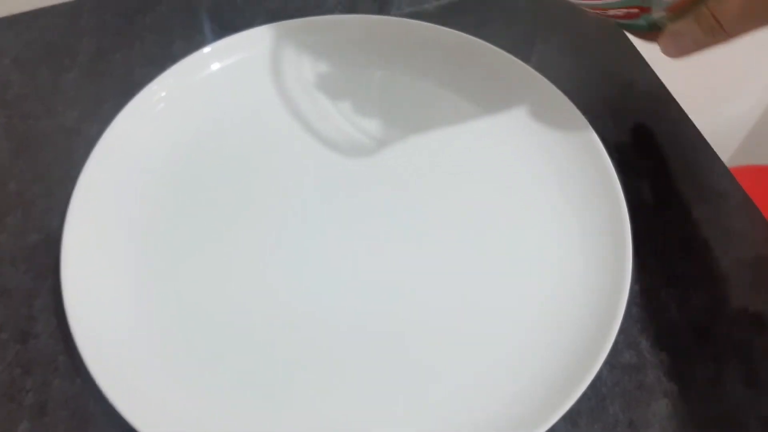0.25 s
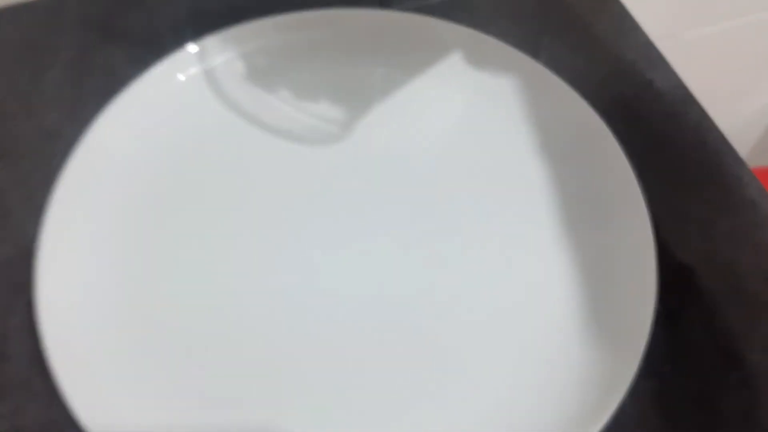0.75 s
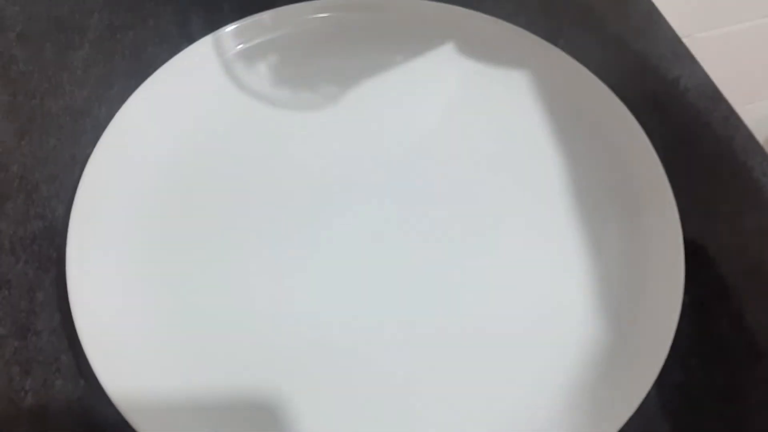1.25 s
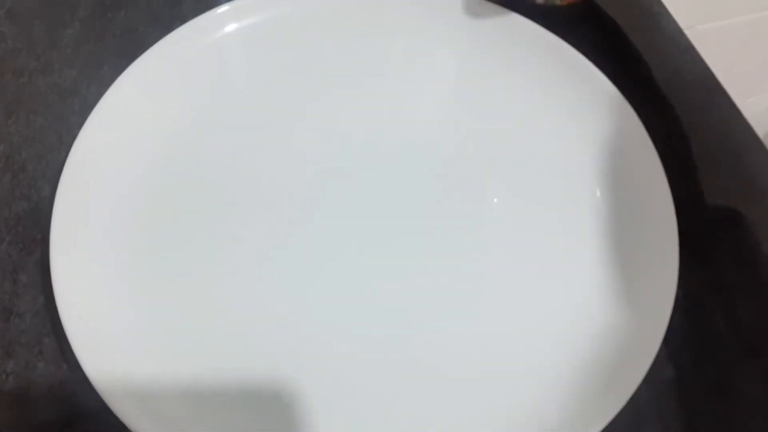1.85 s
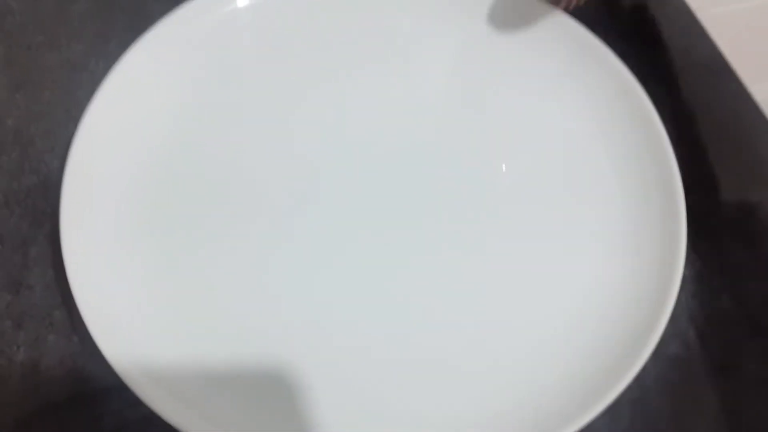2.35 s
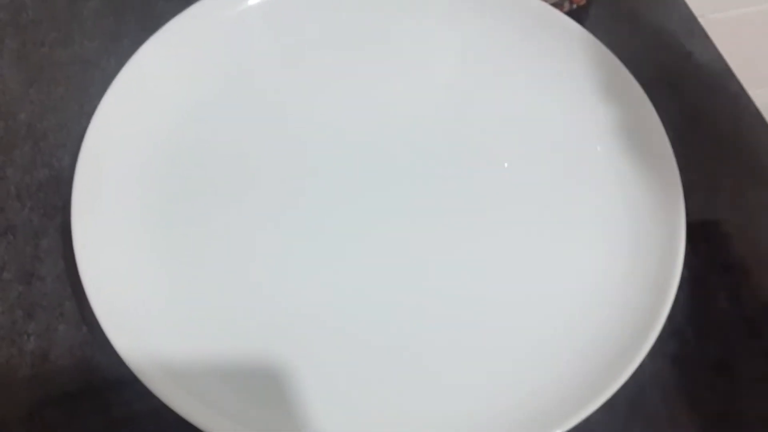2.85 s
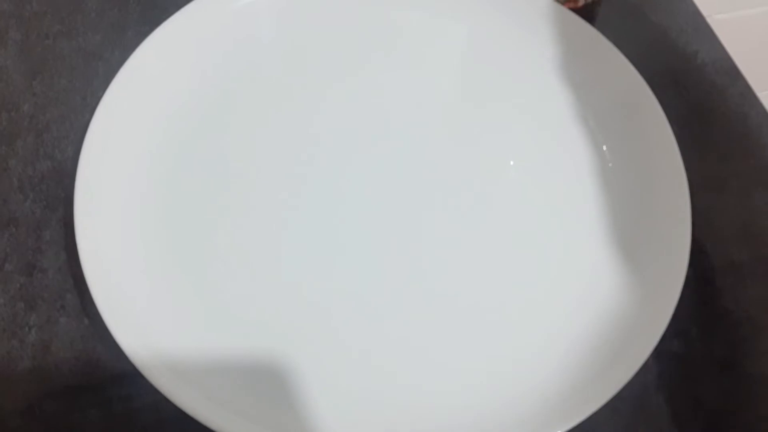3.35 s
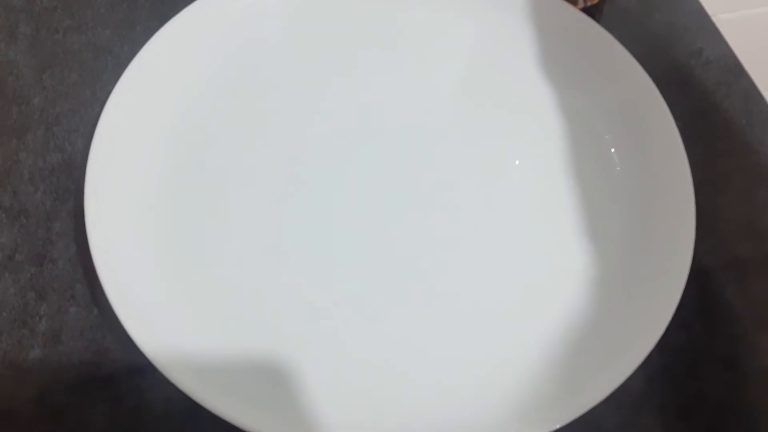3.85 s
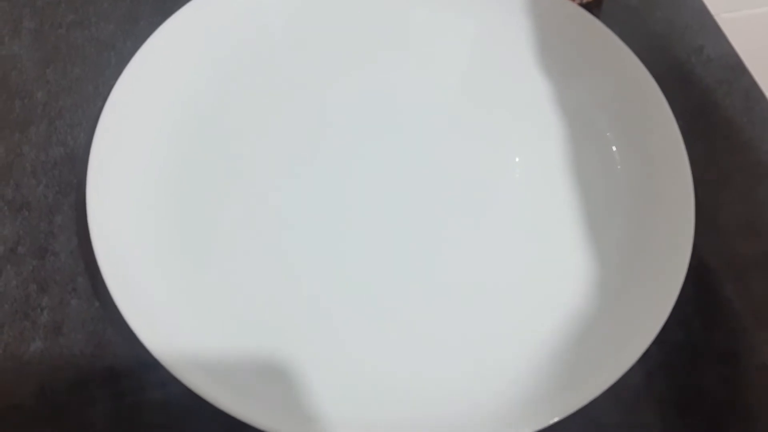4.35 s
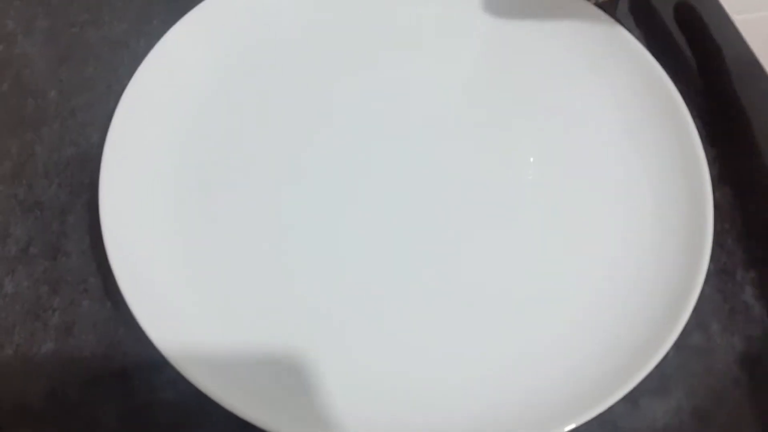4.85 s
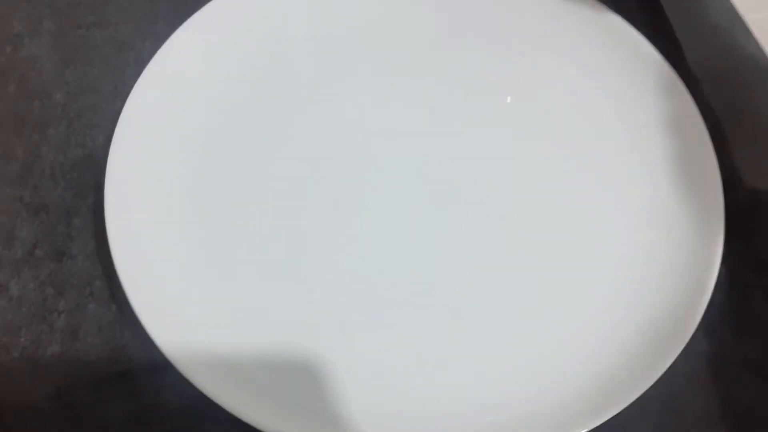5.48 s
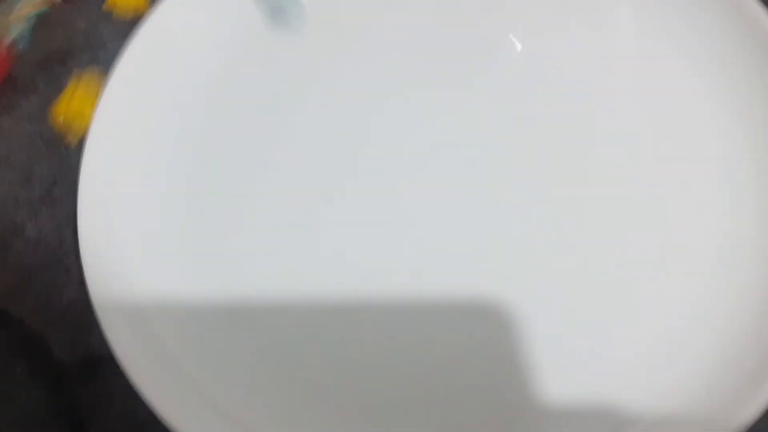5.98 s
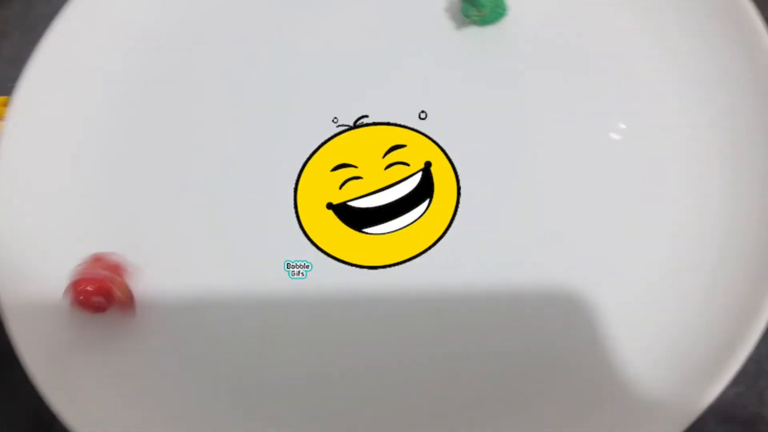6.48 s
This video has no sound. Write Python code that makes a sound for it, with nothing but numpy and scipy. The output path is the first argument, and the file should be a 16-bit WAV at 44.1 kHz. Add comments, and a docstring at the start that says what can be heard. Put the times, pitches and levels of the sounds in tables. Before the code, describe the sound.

Fitful plastic crackling and soft knocks close by in a small kitchen, then hard light pieces tumble and patter across plate and worktop.

```python
"""A thin plastic tub of sugar-coated popcorn is handled over a kitchen worktop: it rustles, crackles and thumps.
Then it is tipped: the popcorn tumbles out in a dense clatter and a few hard pieces set a china plate ringing.
Rustle and clatter are sums of tiny filtered noise bursts; tub and plate are banks of decaying modes.
A small, hard-walled room adds short echoes, over a faint low rumble and hiss."""
import sys
import numpy as np
from scipy import signal
from scipy.fft import rfft, irfft, next_fast_len
from scipy.io import wavfile
from scipy.ndimage import uniform_filter1d

SR = 44100
rng = np.random.default_rng(int(sys.argv[2]) if len(sys.argv) > 2 else 0)


def wav_out(sig):
    """Save sig, one row per channel (or a flat mono array), as 16-bit PCM at SR to the path in sys.argv[1]."""
    wavfile.write(sys.argv[1], SR, np.round(np.clip(np.atleast_2d(sig).T, -1, 1) * 32767).astype(np.int16))


N = 296352
TIME = np.arange(N) / SR  # s


def from_db(db):
    """Level to amplitude: 20 dB is a factor of ten."""
    return 10 ** (np.asarray(db) / 20)


def rms_one(x):
    """Normalise the effective value: root mean square 1."""
    return x / np.sqrt(np.mean(x ** 2) + 1e-20)


def at_hz(points, hz):
    """Linear interpolation of a table on a log-frequency axis."""
    table = np.array(points)
    return np.interp(np.log(np.maximum(hz, 1)), np.log(table[:, 0]), table[:, 1])


def pan(left_db):
    """Level-difference stereo: half the left-right difference goes to each channel."""
    return from_db(np.array([[.5], [-.5]]) * left_db)


def add(track, s, sound):
    """Superposition: mix a sound into a track from a time in seconds."""
    at = round(s * SR)
    track[:, at:at + sound.shape[1]] += sound[:, :N - at]


def causal_filter(gain_at, size=2048):
    """Minimum phase: folding the cepstrum gives a unit-energy response in which nothing sounds early."""
    log_gain = np.log(gain_at(np.fft.rfftfreq(size, 1 / SR)) + 1e-9)
    cepstrum = irfft(log_gain)
    cepstrum[1:size // 2] *= 2
    cepstrum[size // 2 + 1:] = 0
    response = irfft(np.exp(rfft(cepstrum)))
    return response[None] / np.linalg.norm(response)


def colour(x, spectrum):
    """Linear filtering: convolution gives a sound the shape of a spectrum."""
    response = causal_filter(lambda hz: from_db(at_hz(spectrum, hz)), size=8192)
    return signal.fftconvolve(x, response)[:, :x.shape[1]]


# likeness of the two microphones: frequency_hz [Hz], likeness [0-1]
MICROPHONE_LIKENESS = [(100, 0.91), (300, 0.95), (700, 0.4), (1500, 0.02), (3000, 0.11), (8000, 0.02)]


def microphones(pair):
    """Spatial coherence: unrelated signals become left and right, alike in the bass, apart in the treble."""
    count = next_fast_len(pair.shape[1])
    alike = np.clip(at_hz(MICROPHONE_LIKENESS, np.fft.rfftfreq(count, 1 / SR)), 0, 1)
    mid, side = rfft(pair, count) * np.sqrt([(1 + alike) / 2, (1 - alike) / 2])
    return irfft([mid + side, mid - side], count)[:, :pair.shape[1]]


PIECE_COLOUR_DB = 2.7  # standard deviation of the random gains that tell one piece from the next


def crunch(decay_s, size=4096):
    """Stick-slip: a contact breaks up into a dying burst of tiny slips; unit energy a side."""
    dying = from_db(-60 * np.arange(size) / SR / max(decay_s, .001))
    spectrum = rfft(rng.standard_normal((2, size)) * dying)
    # half-flatten the spectrum, and put the other half of the decay back
    evened = irfft(spectrum / np.sqrt(np.abs(spectrum) + 1e-9))
    burst = microphones(evened * np.sqrt(dying))
    # every piece has its own shape, and so its own broad resonances
    shape = np.column_stack([np.geomspace(500, 16000, 24), rng.normal(0, PIECE_COLOUR_DB, 24)])
    burst = signal.fftconvolve(burst, causal_filter(lambda hz: from_db(at_hz(shape, hz))))
    return burst / np.linalg.norm(burst, axis=1, keepdims=True)


# colour common to single contacts: frequency_hz [Hz], relative level_db_per_hz [dB per Hz]
CONTACT_SPECTRUM = [(30, -12), (80, 5), (160, -17), (450, 11), (800, 12.5), (1300, 8.5), (2300, 5.5),
                    (3800, 1), (6000, 7.5), (10000, 8), (13000, -1.5), (16000, -26)]


def contacts(rows, level_db, decay_s):
    """Impact excitation: each contact is a short crunch with its own weight of bass and treble."""
    out = np.zeros((2, N))
    for s, db, bass_db, treble_db in rows:
        tilt = [(400, bass_db), (1250, 0), (3700, 0), (7500, treble_db)]
        gain_at = lambda hz: from_db(at_hz(CONTACT_SPECTRUM, hz) + at_hz(tilt, hz))
        # the filter has unit energy, so the strength of its curve is put back
        strength = np.sqrt(np.mean(gain_at(np.linspace(0, SR / 2, 512)) ** 2))
        sound = signal.fftconvolve(crunch(decay_s), causal_filter(gain_at))
        add(out, s, from_db(db + level_db) * strength * sound)
    return out


def struck(modes, blows, count=30000):
    """Modal excitation: a blow rings the modes near its centre most; harder contacts centre higher."""
    out, t = np.zeros((2, N)), TIME[:count]
    rings = []
    for hz, db, t60, left_db in modes:
        decay = from_db(db - 60 * t / t60)
        rings.append(pan(left_db) * decay * np.exp(2j * np.pi * hz * t))
    for s, blow_db, centre_hz, spread_octaves in blows:
        sound = 0
        for (hz, *_), ring in zip(modes, rings):
            share = np.exp(-.5 * (np.log2(hz / centre_hz) / spread_octaves) ** 2)
            # short waves reach the two microphones out of step
            apart = (1 - at_hz(MICROPHONE_LIKENESS, hz)) * rng.uniform(-.8, .8, (2, 1))
            phase = np.pi * (rng.integers(2) + apart)
            sound = sound + share * (ring * np.exp(1j * phase)).imag
        add(out, s, from_db(blow_db) * sound)
    return out


GRAIN_SPREAD_DB = 3.9  # how much the sizes of tiny contacts scatter: mean of the exponential draw


def grains(spectrum, per_s, spread_db, decay_s, count=8):
    """Shot noise: many random contacts, dealt to several kinds of crunch; level evened to about rms 1."""
    out = 0
    for _ in range(count):
        sizes = from_db(spread_db * np.minimum(rng.exponential(1, N), 4)) * rng.choice([-1, 1], N)
        clicks = sizes * (rng.random(N) < per_s / count / SR)
        out = out + signal.oaconvolve(clicks[None], crunch(decay_s))[:, :N]
    out = colour(out, spectrum)
    power = uniform_filter1d(np.mean(out ** 2, axis=0), size=2600)
    return out / np.sqrt(power + 0.0008 * power.mean())


def strokes(rows, attack_s, release_db_per_s):
    """Envelope: attack, hold and release, summed in power; one gain in time per level column."""
    power = 0
    for start, hold_s, *levels_db in rows:
        age = TIME - start
        attack = np.clip(age / attack_s, 0, 1)
        release = from_db(-release_db_per_s * np.clip(age - attack_s - hold_s, 0, 1))
        power = power + np.outer(from_db(levels_db), attack * release) ** 2
    return np.sqrt(power)


def strays(gain, start_s, over_db, bass_db, treble_db, count):
    """Random process: lesser contacts at scattered moments, levelled against the rustle around them."""
    draws, spread_db = rng.random((count, 4)), 4
    times = start_s + (np.arange(count) + draws[:, 0]) / count * (TIME[-1] - start_s)
    levels = draws[:, 1:] * 2 * spread_db - spread_db + [over_db, bass_db, treble_db]
    levels[:, 0] += 20 * np.log10(np.interp(times, TIME, gain) + 1e-9)
    return np.column_stack([times, levels])


# the rumble at rest keeps its level; past a threshold of movement it follows a share of the swing in dB
RUMBLE_DB, RUMBLE_THRESHOLD_DB, RUMBLE_FOLLOWS = -69.5, -78.5, 0.28
HISS_DB = -77
# low rumble of the room: frequency_hz [Hz], relative level_db_per_hz [dB per Hz]
RUMBLE_SPECTRUM = [(20, -15.5), (50, -9.5), (80, 2), (140, 0), (220, -8), (400, -15), (1000, -24),
                   (3000, -85)]
# faint hiss: frequency_hz [Hz], relative level_db_per_hz [dB per Hz]
HISS_SPECTRUM = [(300, -17.5), (1000, -8), (4000, -15), (10000, -18), (13000, -22.5), (16000, -27)]


def background(movement):
    """Filtered noise: a low rumble that swells when the tub moves, under a faint steady hiss."""
    rumble = rms_one(colour(microphones(rng.standard_normal((2, N))), RUMBLE_SPECTRUM))
    hiss = rms_one(colour(microphones(rng.standard_normal((2, N))), HISS_SPECTRUM))
    smooth_movement = uniform_filter1d(movement, size=8000)
    swell = (1 + smooth_movement / from_db(RUMBLE_THRESHOLD_DB)) ** RUMBLE_FOLLOWS
    return (from_db(RUMBLE_DB) * swell * rumble + from_db(HISS_DB) * hiss) * pan(left_db=-2.1)


# each grip swells, holds and lets go
GRIP_ATTACK_S, GRIP_RELEASE_DB_PER_S = 0.0067, 98
SNAP_DECAY_S, CRINKLE_DECAY_S = 0.047, .004  # nominal fall by 60 dB
# fingers shift their grip on the tub, relative levels:
# start_s [s], hold_s [s], rubbing_level_db [dB], crinkling_level_db [dB]
GRIP_STROKES = [(0.398, 0.57, -78.5, -80), (0.82, 0.053, -69.5, -71.5), (0.957, 0.64, -66, -62),
                (1.253, 0.059, -54.5, -73), (1.564, 0.12, -60.5, -66.5), (2.035, 0.13, -65.5, -71),
                (2.353, .14, -68, -70.5), (2.536, 0.016, -66, -53), (2.608, 0.061, -57, -58),
                (2.725, 0.072, -70, -59.5), (2.974, 0.36, -68, -66.5), (3.462, .14, -64.5, -68.5),
                (3.69, .65, -75.5, -100), (4.337, 0.036, -69, -76), (4.398, 0.026, -51.5, -70),
                (4.644, 0.023, -72, -77.5), (4.982, 0.02, -66, -65), (5.1, 0.23, -72.5, -70.5),
                (5.432, 0.16, -68, -71)]
# loudest snaps of the tub wall, relative levels: start_s [s], level_db [dB], bass_db [dB], treble_db [dB]
WALL_SNAPS = [(0.1995, -57.5, 8, -14), (0.4407, -51.5, -1, -13.5), (0.5577, -49.5, -0.5, -10.5),
              (0.9205, -41.5, 2, 2), (0.9432, -37, -9, -13), (0.9506, -37.5, -6, -8),
              (0.9815, -52, -22, 6.5), (1.0571, -49.5, -13, 3.5), (1.1183, -40, -1, -1),
              (1.1379, -27.5, -6, -7), (1.291, -33.5, -12.5, -2), (1.2982, -36.5, -2, -3),
              (1.3463, -38, -2, -12), (1.4744, -35.5, -4.5, -13), (1.66, -48, 2, -5),
              (1.7177, -42.5, -2, -26), (1.936, -53.5, 3, -15), (2.0095, -32.5, -24, -19.5),
              (2.153, -50.5, -13, -14), (2.369, -40.5, -1, -11), (2.544, -61, -26, 5),
              (2.664, -44, -10, -13), (2.7761, -44, -34, -10.5), (3.1117, -46.5, -21, 0.5),
              (3.7413, -51, -9, -7), (4.6664, -58, 4, -12), (5.003, -49, 0, -8), (5.2567, -26, 0.5, -14)]
# dull rubbing of the fingers: frequency_hz [Hz], relative level_db_per_hz [dB per Hz]
RUB_SPECTRUM = [(60, -33), (150, 3.5), (300, 4.5), (600, 3), (1200, -2.5), (2400, -9.5), (4500, -17),
                (10000, -22), (16000, -43)]
# crinkling of the thin wall: frequency_hz [Hz], relative level_db_per_hz [dB per Hz]
CRINKLE_SPECTRUM = [(500, -19), (1800, -0.5), (3500, -2), (6000, -2.5), (8000, -5.5), (10000, -6),
                    (12500, -16), (16000, -21)]


def handling(rubbing, crinkling):
    """Friction and buckling: fingers rub and crinkle the thin wall, which snaps now and then."""
    rub = rubbing * grains(RUB_SPECTRUM, per_s=450, spread_db=5.0, decay_s=0.031)
    crinkle_grains = grains(CRINKLE_SPECTRUM, per_s=840, spread_db=GRAIN_SPREAD_DB, decay_s=CRINKLE_DECAY_S)
    crinkle = from_db(-0.5) * crinkling * crinkle_grains
    small = strays(crinkling, GRIP_STROKES[0][0], over_db=14, bass_db=-4, treble_db=-7, count=50)
    snaps = contacts([*WALL_SNAPS, *small], level_db=18.0, decay_s=SNAP_DECAY_S)
    return (rub + crinkle) * pan(left_db=-3.0) + snaps * pan(left_db=-2.0)


# every listed snap sets the wall ringing around one pitch; its level is relative to the snap
WALL_RING_DB, WALL_RING_HZ, WALL_RING_OCTAVES = -14.5, 2070, 0.66
# modes of the tub with its load of popcorn, relative levels:
# pitch_hz [Hz], level_db [dB], t60_s [s], left_right_db [dB]
TUB_MODES = [(45, 0, 0.7, 2), (81.1, -1, 0.91, -3), (108, -2, 0.59, -1), (161.5, -3, 0.45, -2),
             (213.3, -4, 0.43, 3), (252.4, 0, 0.32, -2), (280, -0.5, 0.21, -2), (369, 7, 0.1, -2),
             (413.3, -5.5, 0.33, -21), (441.7, -2, 0.34, 2), (491, -2, 0.4, -3), (542, 2.5, 0.22, -5),
             (607, -1.5, 0.088, 10), (783, -11, 0.25, 0), (776, 5, 0.026, -3), (956, -0.5, 0.05, -8),
             (1208, 13, 0.037, 0), (1705, 6.5, 0.032, -2), (2082, -8, 0.12, -4), (2304, -2, 0.059, 7),
             (2510, -7, 0.062, -6)]
# thumps of the tub, relative levels: start_s [s], level_db [dB], centre_hz [Hz], spread_octaves [octaves]
TUB_THUMPS = [(1.291, -47.5, 201, 0.48), (1.472, -46, 140, 1.23), (1.715, -53, 216, 0.61),
              (2.009, -46.5, 390, 0.77), (2.028, -51, 51.3, 1.07), (2.65, -54.5, 246, 0.53),
              (4.4, -44, 785, .3), (4.412, -48.5, 206, 0.36), (4.422, -34, 173, 0.4),
              (4.442, -49, 790, 0.24), (4.48, -50, 740, 0.21), (5.256, -34.5, 443, 0.68),
              (5.261, -46.5, 117, 0.7), (5.559, -39.5, 413, 1.2), (5.725, -44.5, 184.4, 0.91),
              (5.803, -38.5, 754, 0.54), (6.415, -40, 760, 0.67), (6.452, -41, 970, 0.32),
              (6.491, -50, 547, 0.51), (6.617, -60, 167, 0.88)]


def tub():
    """Shell modes: thumps ring the low modes of the loaded tub; snaps ring the high modes of its wall."""
    wall = [(s, db + WALL_RING_DB, WALL_RING_HZ, WALL_RING_OCTAVES) for s, db, *_ in WALL_SNAPS]
    return struck(TUB_MODES, TUB_THUMPS) + struck(TUB_MODES, wall, count=6000)


# reverberation time of the kitchen, up to 1 kHz and from 12 kHz
ROOM_T60_S, ROOM_TREBLE_T60_S = 0.29, 0.13
# echoes of the kitchen: frequency_hz [Hz], relative level_db [dB]
ECHO_LEVEL = [(100, 3.5), (500, -1), (2000, -3.5), (6000, -5), (14000, -2)]


def kitchen(x, count=26000):
    """Reverberation: dense echoes off near walls, dying sooner in the treble."""
    t, edges = TIME[:count], np.geomspace(40, 18000, 13)
    white, echoes = rng.standard_normal((2, 2, count)), 0
    for k, (low, high) in enumerate(zip(edges, edges[1:])):
        hz = np.sqrt(low * high)
        t60 = np.interp(hz, [1000, 12000], [ROOM_T60_S, ROOM_TREBLE_T60_S])
        dying = from_db(-60 * t / t60) * (t > .003)  # no echo in the first 3 ms
        band_pass = signal.butter(2, [low, high], "band", fs=SR, output="sos")
        band = signal.sosfilt(band_pass, white[k % 2])
        echoes = echoes + band * dying / np.linalg.norm(dying) * from_db(at_hz(ECHO_LEVEL, hz))
    return np.array([signal.fftconvolve(direct, wall)[:N] for direct, wall in zip(x, microphones(echoes))])


TAP_DULL_HZ, TAP_DECAY_S = 3800, .018  # low-pass corner; nominal fall by 60 dB
# single pieces dropping inside the tub: start_s [s], relative level_db [dB]
TAP_DROPS = [(1.408, -33.5), (3.1963, -35), (3.255, -38.5), (3.3239, -32), (3.3385, -36), (3.474, -28.5),
             (3.492, -36), (3.5798, -47)]
# their colour: frequency_hz [Hz], relative level_db_per_hz [dB per Hz]
TAP_SPECTRUM = [(100, -26), (400, -9), (900, -0.5), (1500, -3.5), (2200, 2.5), (3200, -1.5), (4500, -1.5),
                (6500, -12.5), (14000, -18)]


def taps(level_db):
    """Contact stiffness: light pieces drop on one another in woody ticks, dulled by the soft contact."""
    out = np.zeros((2, N))
    soft = signal.butter(3, TAP_DULL_HZ, fs=SR, output="sos")
    for s, db in TAP_DROPS:
        tick = signal.sosfilt(soft, colour(crunch(TAP_DECAY_S), TAP_SPECTRUM))
        add(out, s, from_db(db + level_db) * tick)
    return out


SURGE_ATTACK_S, SURGE_RELEASE_DB_PER_S = 0.0091, 81
# the flow starts dense and thins out as the tub empties: contacts per second, time to fall to 1/e
FLOW_START_PER_S, FLOW_THINS_S = 3000, .38
LANDING_DECAY_S, PATTER_DECAY_S = 0.03, .011  # nominal fall by 60 dB
# the popcorn leaves the tub in surges, relative levels:
# start_s [s], hold_s [s], tumbling_level_db [dB], patter_level_db [dB]
SPILL_SURGES = [(5.547, .03, -41.5, -46), (5.59, 0.057, -34, -41.5), (5.72, 0.1, -48, -42),
                (5.93, 0.27, -49.5, -42.5), (6.27, 0.072, -52, -45), (6.375, 0.045, -50.5, -52),
                (6.63, .05, -67.5, -51)]
# loudest pieces landing, relative levels: start_s [s], level_db [dB], bass_db [dB], treble_db [dB]
PIECE_LANDINGS = [(5.5578, -30.5, 18.5, -8), (5.6176, -10, 0.5, -18.5), (5.7384, -38, -30, 16.5),
                  (5.8007, -16, -17, -8.5), (5.8287, -22, -38, -7), (5.8964, -20, -17, -11),
                  (5.9588, -15.5, -20, -8.5), (6.0057, -13.5, -49, -8.5), (6.0644, -36.5, -28, 14.5),
                  (6.1418, -24, 7, -2), (6.1604, -24, -5, -4), (6.1928, -26.5, -26, 1),
                  (6.2791, -29, -35, -16), (6.3205, -25, -50, -8), (6.4153, -35, -8, -17),
                  (6.4467, -27, 8, -34), (6.4954, -40, -10, 1), (6.523, -28.5, -28.5, -7.5),
                  (6.6489, -34.5, -39, -1), (6.6827, -40, -26, 2)]
# tumbling along the hollow tub: frequency_hz [Hz], relative level_db_per_hz [dB per Hz]
TUMBLE_SPECTRUM = [(40, -35), (90, -24), (200, -3), (350, 0.5), (480, 3), (800, 2), (1200, 3.5), (2000, 2),
                   (3500, -20), (7000, -9), (15000, -25)]
# patter on the worktop: frequency_hz [Hz], relative level_db_per_hz [dB per Hz]
PATTER_SPECTRUM = [(400, -16), (1400, -1.5), (2500, 6.5), (4200, 7.5), (6000, -1.5), (8000, -4),
                   (10000, -3.5), (12500, -10), (16000, -31)]


def spill(tumbling, pattering):
    """Granular flow: pieces tumble along the hollow tub, then patter on the worktop, ever fewer."""
    start_s = SPILL_SURGES[0][0]
    flow = FLOW_START_PER_S * np.exp(-np.maximum(TIME - start_s, 0) / FLOW_THINS_S)
    tumble_grains = grains(TUMBLE_SPECTRUM, per_s=.6 * flow, spread_db=GRAIN_SPREAD_DB, decay_s=0.02)
    tumble = from_db(2.5) * tumbling * tumble_grains
    patter_grains = grains(PATTER_SPECTRUM, per_s=flow, spread_db=GRAIN_SPREAD_DB,
                           decay_s=PATTER_DECAY_S, count=11)
    patter = from_db(1.5) * pattering * patter_grains
    small = strays(pattering, start_s, over_db=10.5, bass_db=-12, treble_db=0.5, count=22)
    landings = contacts([*PIECE_LANDINGS, *small], level_db=11.5, decay_s=LANDING_DECAY_S)
    return (tumble + patter) * pan(left_db=-1.5) + landings * pan(left_db=-2.5)


# modes of the china plate: pitch_hz [Hz]
PLATE_MODES_HZ = [1803, 2550, 3052, 3327, 3537, 4155, 4748, 5064, 5980, 6150, 6943, 7483, 7966, 9029, 9450,
                  10160, 10830, 11320, 12549, 13830]
# how each of them rings: relative level_db [dB], t60_s [s], left_right_db [dB]
PLATE_MODE_RING = [(0, 0.23, -6), (3.5, 0.23, -0.5), (-16, 0.11, -2), (4.5, 0.21, -7.5), (-4, 0.065, -12),
                   (2, 0.07, -11), (-16, 0.097, -8), (3, 0.078, -15), (-1.5, 0.2, -9), (-5, 0.088, 2),
                   (-1, 0.11, -17.5), (-5.5, 0.17, -10), (3, 0.11, -6), (-4, 0.15, -17.5), (-17, 0.085, -1),
                   (-5.5, 0.21, -7), (-1, 0.064, 8), (-6, 0.32, 2), (-2, .14, 2), (-11, 0.14, 11)]
# the sharp crack of hard sugar on the glaze:
# pitch_hz [Hz], relative level_db [dB], t60_s [s], left_right_db [dB]
GLAZE_CRACK_MODE = (5700, 17, .0015, -10)
# hard pieces on the plate, relative levels:
# start_s [s], level_db [dB], centre_hz [Hz], spread_octaves [octaves]
PLATE_PINGS = [(5.8293, -30, 5400, 0.89), (5.963, -26.5, 4200, 0.35), (5.968, -32.5, 4040, 0.94),
               (6.006, -28.5, 2250, .55), (6.017, -32, 2730, 1.84), (6.022, -42, 7100, 0.76),
               (6.101, -44.5, 4000, 0.33), (6.279, -43, 4730, 0.54), (6.321, -35, 5870, 0.58),
               (6.353, -40.5, 6040, .65)]


def china_plate():
    """Mode splitting: the plate is not quite round, so each mode beats against a weaker twin."""
    twin_db, split_hz = -7, 14
    modes = [(hz, *ring) for hz, ring in zip(PLATE_MODES_HZ, PLATE_MODE_RING)]
    twins = [(hz + split_hz, db + twin_db, t60, left_db) for hz, db, t60, left_db in modes]
    return struck(modes + twins + [GLAZE_CRACK_MODE], PLATE_PINGS, count=16000)


def scene():
    """Superposition of direct sound, echoes and background: tub, popcorn and plate in the kitchen."""
    rubbing, crinkling = strokes(GRIP_STROKES, GRIP_ATTACK_S, GRIP_RELEASE_DB_PER_S)
    tumbling, pattering = strokes(SPILL_SURGES, SURGE_ATTACK_S, SURGE_RELEASE_DB_PER_S)
    clatter = handling(rubbing, crinkling) + spill(tumbling, pattering)
    ticks = taps(level_db=18) * pan(left_db=-2.0)
    thumps, plate = tub(), china_plate()
    into_room = clatter + from_db(-1.5) * ticks + from_db(-9) * thumps + from_db(-11) * plate
    echoes = kitchen(into_room)
    return clatter + ticks + thumps + plate + echoes + background(rubbing + tumbling)


CUTOFF_HZ = 16000


def record(dry):
    """Band limiting: an elliptic low-pass cuts the top steeply."""
    low_pass = signal.ellip(10, .1, 80, CUTOFF_HZ, fs=SR, output="sos")
    return signal.sosfilt(low_pass, dry)


dry = scene()
out = record(dry)
wav_out(out)
```